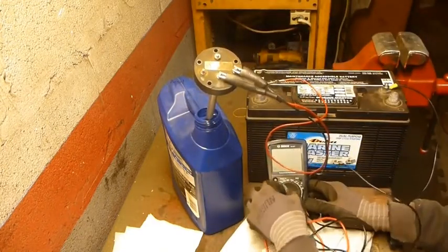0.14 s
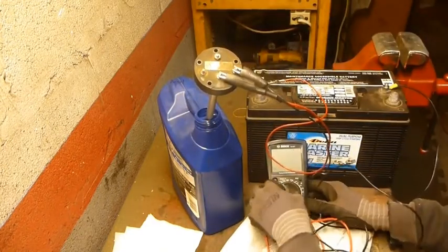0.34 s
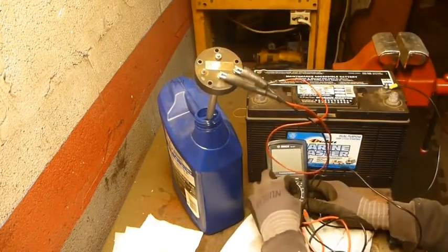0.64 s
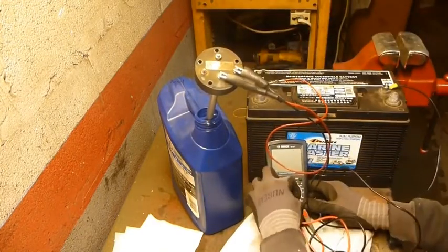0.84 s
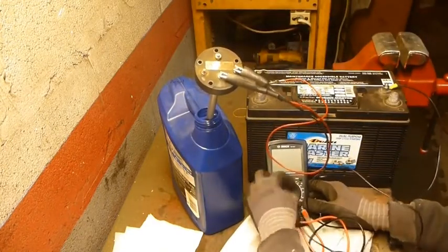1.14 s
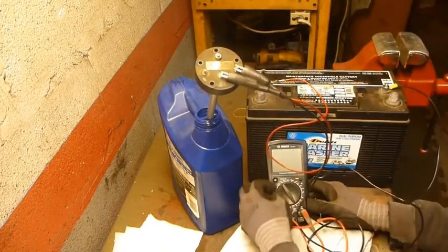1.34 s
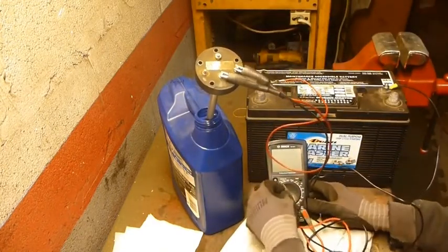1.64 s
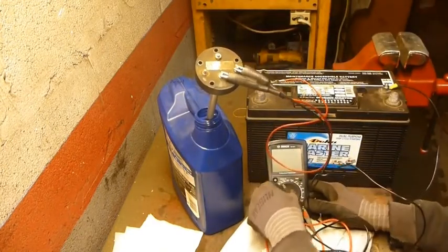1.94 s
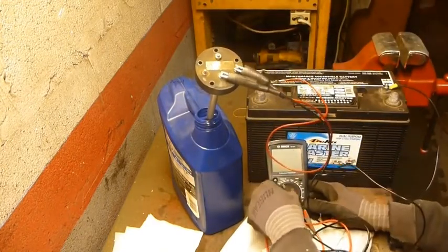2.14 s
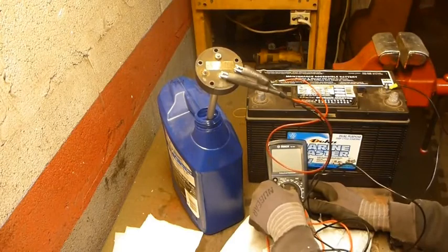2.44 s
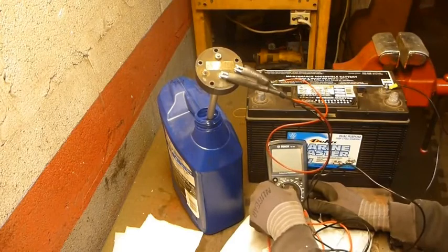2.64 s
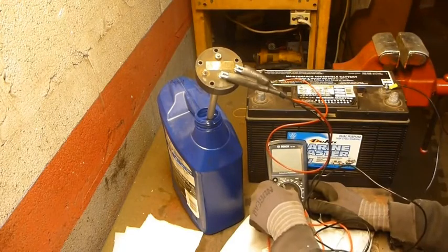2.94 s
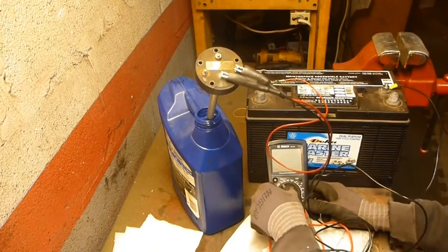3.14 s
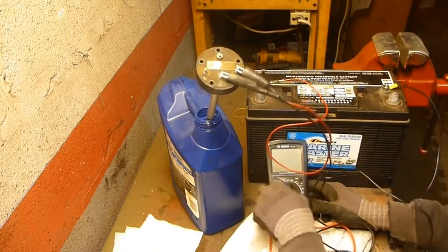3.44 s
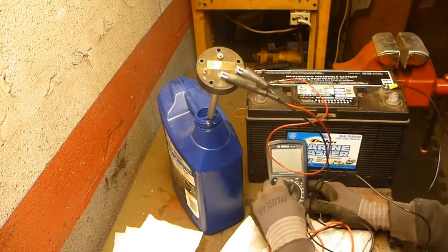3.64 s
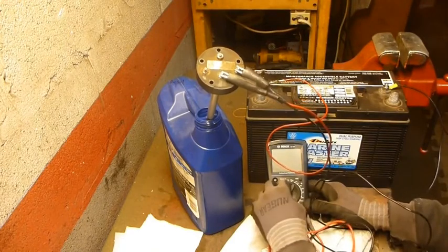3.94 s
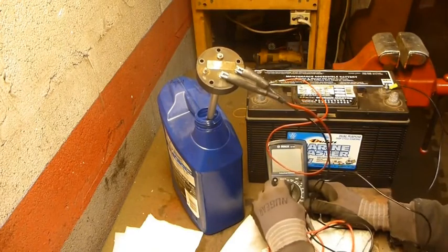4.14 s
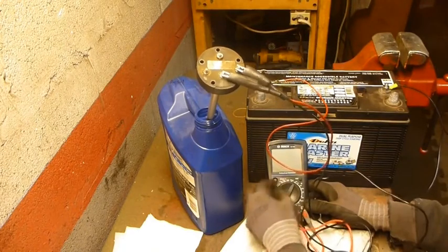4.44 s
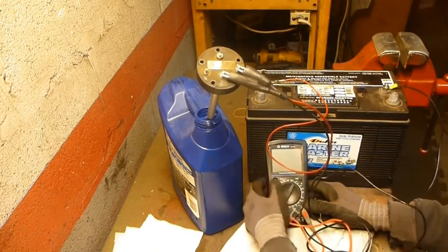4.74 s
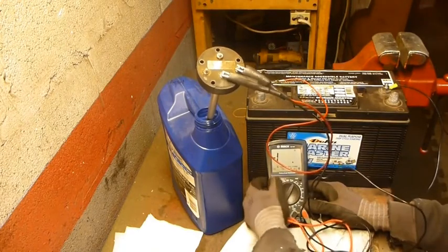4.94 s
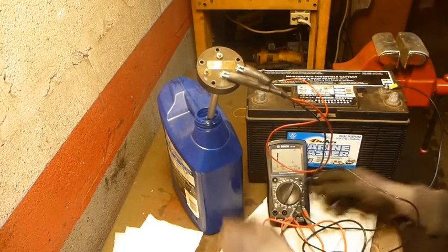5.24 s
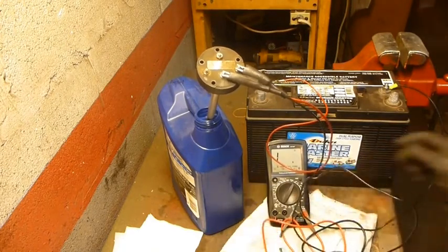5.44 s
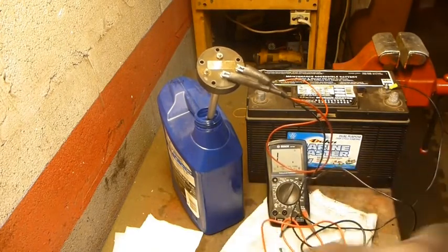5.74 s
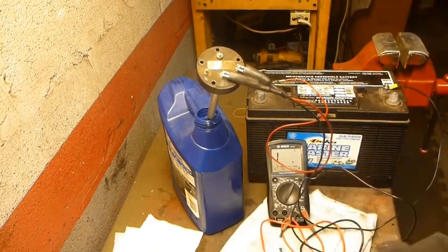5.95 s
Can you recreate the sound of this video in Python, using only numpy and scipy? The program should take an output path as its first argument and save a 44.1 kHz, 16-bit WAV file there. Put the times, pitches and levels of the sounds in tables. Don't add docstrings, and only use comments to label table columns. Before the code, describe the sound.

A meter's rotary dial is turned by hand, a quick run of bright plastic clicks, a pause, then a short return burst over steady hiss.

```python
import sys
import numpy as np
from scipy import signal
from scipy.io import wavfile
from scipy.ndimage import uniform_filter1d

SR = 44100
rng = np.random.default_rng(int(sys.argv[2]) if len(sys.argv) > 2 else 0)


def file_out(sig):
    cols = np.atleast_2d(sig).T
    lim = np.clip(cols, -1, 1)
    pcm = np.round(lim * 32767).astype(np.int16)
    wavfile.write(sys.argv[1], SR, pcm)


def field_ratio(decibels):
    return 10 ** (np.asarray(decibels, dtype=float) / 20)


N = 268789


def evened(x):
    return x / np.sqrt(np.mean(x ** 2) + 1e-20)


def read(points, hz):
    f, value = np.transpose(points)
    return np.interp(np.log(hz + 1), np.log(f + 1), value)


def coloured(points, patchy_db):
    hz = np.fft.rfftfreq(2048, 1 / SR)
    real, imaginary, patches = rng.standard_normal((N // 512 + 5, 1025, 3)).T
    patches = uniform_filter1d(patches, size=20, axis=0)
    patches = evened(uniform_filter1d(patches, size=6, axis=1))
    level_db = read(points, hz)[:, None] + patchy_db * patches
    spectrum = (real + 1j * imaginary) * field_ratio(level_db)
    return evened(signal.istft(spectrum, nperseg=2048, noverlap=1536)[1][:N])


def ring(drive, modes, luck_db, blur=0.65):
    out = np.zeros(len(drive))
    for (hz, width, db), strength_db in zip(modes, luck_db):
        radius = np.exp(-np.pi * width * blur / SR)
        angle = 2 * np.pi * hz / SR
        mode = signal.lfilter([1, 0, -1], [1, -2 * radius * np.cos(angle), radius ** 2], drive)
        out += field_ratio(db + strength_db) * evened(mode)
    return out


def background():
    # frequency in Hz, density in dB per Hz.
    hiss = [(20, -27), (54, -21), (112, -5), (238, -2.5), (565, -6.5), (1340, -13.5), (3350, -21),
            (15500, -35.5)]
    # frequency in Hz, level in dB rms.
    harmonics = [(120, -70), (240, -67), (360, -60), (480, -57), (600, -62.5)]
    hum_width_hz = 10.7
    hum = np.zeros(N)
    for hz, db in harmonics:
        hum += ring(rng.standard_normal(N), [(hz, hum_width_hz, db)], [0])
    return field_ratio(-45.5) * coloured(hiss, patchy_db=0.38) + hum


def click(snap_db, thud_db, panel_db, favoured_hz, knock_db, tick_db, length_ms, flank):
    # frequency in Hz, width in Hz, level in dB.
    knock = [(170, 45, -13.5), (214, 97, 0.5), (300, 300, -26)]
    thud = [(475, 64, 2.5), (733, 210, -0.5), (874, 84, 2), (1200, 134, -1)]
    panel = [(1790, 130, -13.5), (2036, 99, -2), (2268, 240, 1.5), (2480, 140, -8)]
    snap = [(3780, 500, -2), (4340, 880, -4), (4750, 910, -4.5), (5840, 850, -2), (7060, 3300, -32)]
    tick = [(8680, 480, -8), (10130, 1900, 4.5), (11250, 1100, -2.5), (13100, 650, 3), (15100, 2100, -29)]
    # level in dB re the blow, decay time T60 in s.
    garage = [(-0.5, 0.1), (-7, 0.14), (-13.5, 0.24), (-8.5, 0.17), (-11, 0.17)]
    part_edges_hz = (1500, 3000, 7800)
    favour_db, favour_sharpness = 5.5, 13

    ms = np.arange(9000) / SR * 1000
    luck_db = rng.standard_normal((5, 6))
    noise = rng.standard_normal((2, 5, len(ms)))
    impacts = noise[0] * field_ratio(3.6 * np.minimum(rng.exponential(1, len(ms)), 3.2))

    u = np.maximum(ms - 10, 0) / np.maximum(0.61 * length_ms, .05)
    v = np.maximum(ms - 9.1, 0) / np.maximum(0.789 * length_ms, .05)
    climb = 0.065 * np.exp(-abs(ms - 10) / 2.8)
    rattle = u * np.exp(-u)
    push = v * np.exp(-v) + climb
    hard_contacts = rattle * (np.exp(-.6 * u) + 0.087)

    # level in dB, force envelope, modes, strength of its one firm landing
    parts = ((knock_db - 3.5, push, knock, 1.3),
             (snap_db + thud_db, push, thud, 0.82),
             (snap_db + panel_db, rattle + climb, panel, 0.83),
             (snap_db - 3.0, rattle, snap, 0.62),
             (snap_db + tick_db, hard_contacts, tick + [flank], 0.17))
    favoured_part = 1 + np.searchsorted(part_edges_hz, favoured_hz)
    out = np.zeros(len(ms))
    for k, ((db, force, modes, firm), (tail_db, t60)) in enumerate(zip(parts, garage)):
        if k == favoured_part:
            modes = modes + [(favoured_hz, favoured_hz / favour_sharpness, favour_db)]
        drive = force * impacts[k]
        drive[np.argmax(force)] += firm * np.linalg.norm(drive)
        direct = ring(drive, modes, luck_db[k])
        direct = direct / np.sqrt(uniform_filter1d(direct ** 2, size=130).max())
        build_up = 1 - np.exp(-np.maximum(ms - 11., 0) / 2.1)
        decay = field_ratio(-60 * (ms - 8) / 1000 / t60)
        diffuse = evened(ring(noise[1, k], modes, luck_db[k], blur=1.6))
        out += field_ratio(db) * (direct + field_ratio(tail_db) * build_up * decay * diffuse)
    return out


def dial():
    # time in s, snap level in dB,
    # thud and panel levels in dB re the snap, favoured resonance in Hz.
    seated = [
        (0.463, -18, -9.5, -5.5, 10300),
        (0.5465, -24, -4.5, -2.5, 2310),
        (0.6303, -22.5, -11.5, -3.5, 5950),
        (0.6733, -23.5, -1.5, -4, 870),
        (0.7009, -23.5, 2, -3, 905),
        (0.7541, -26, -5, -5, 3580),
        (0.822, -23, -3.5, 0, 2490),
        (0.8772, -24, -1.5, 2, 2310),
        (3.5103, -17, -5, -5.5, 513),
        (3.5878, -21.5, -8.5, 2, 2600),
    ]
    # time in s, snap level in dB,
    # thud and panel levels in dB re the snap, favoured resonance in Hz.
    glancing = [(0.4229, -18, -13, -1.5, 2100), (0.4317, -20.5, -14, -3, 3640),
                (0.4732, -25, -11, -5, 2200), (0.477, -24, -9, -1, 4750), (0.5534, -21, -8, -2.5, 491),
                (0.9004, -42.5, 4, 0, 478), (1.1306, -42, -14, -16, 3720), (1.136, -51.5, 10, -10, 910),
                (3.5164, -21, -4, 0, 860), (3.6654, -26, -2, -0.5, 1150), (5.5195, -52, 3, -13, 4750)]
    # frequency in Hz, width in Hz, level in dB.
    tick_forward = (8780, 490, 1.7)
    tick_back = (13800, 970, 1)
    bounce_s, rest_s, reverse_s = .03, .3, 2
    soft_db, soft_dull = -28, 2.5

    blows = [(*row, -30, 3.1) for row in seated]
    blows += [(*row, -43, 2.8) for row in glancing]
    out, last_s = np.zeros(N + 9000), 0
    for s, snap_db, thud_db, panel_db, hz, knock_db, length_ms in sorted(blows):
        gap_s, last_s = s - last_s, s
        returning = s > reverse_s
        tick_db = -4.5 if gap_s < bounce_s else -2.5
        tick_db += soft_dull * min(snap_db - soft_db, 0)
        if returning and bounce_s < gap_s < rest_s:
            tick_db -= 2.5
        flank = tick_back if returning or gap_s > rest_s else tick_forward
        start = round((s - .0105) * SR)
        out[start:start + 9000] += click(snap_db, thud_db, panel_db, hz, knock_db, tick_db, length_ms, flank)
    return signal.sosfilt(signal.butter(3, 110, "high", fs=SR, output="sos"), out[:N])


def glove():
    # time in s, level in dB, hold in ms.
    rubs = [
        (4.79, -71, 60),
        (4.86, -67, 8),
        (4.898, -66, 4),
        (5.092, -59, 6),
        (5.135, -53, 62),
        (5.278, -52, 6),
        (5.946, -50.5, 8),
        (6.0, -68, 90),
    ]
    # frequency in Hz, density in dB per Hz.
    rustle_colour = [(500, -11), (2000, 7), (4000, 4), (8000, 1), (14000, 5), (16000, -8)]
    rise_db_per_ms, fall_db_per_ms = 1.5, .5
    t = np.arange(N) / SR
    grain = field_ratio(4.5 * uniform_filter1d(rng.exponential(1, N), size=40))
    pressure = np.zeros(N)
    for s, db, held_ms in rubs:
        rise_db = rise_db_per_ms * np.maximum(1000 * (s - t), 0)
        fall_db = fall_db_per_ms * np.maximum(1000 * (t - s) - held_ms, 0)
        pressure += field_ratio(db - rise_db - fall_db)
    return pressure * field_ratio(-2.0) * evened(grain * coloured(rustle_colour, patchy_db=0))


def scuffs():
    # time in s, level in dB, frequency in Hz, width in Hz, length in ms.
    contacts = [
        (4.98, -57, 2010, 400, 12),
        (5.155, -58, 2030, 300, 14),
        (5.2, -53, 2010, 400, 15),
        (5.45, -56, 3470, 900, 25),
        (5.69, -51, 1514, 140, 44),
        (6.0, -59, 3780, 1800, 130),
        (5.17, -50.5, 170, 150, 180),
        (5.45, -54, 805, 1200, 1800),
    ]
    t = np.arange(N) / SR
    out = np.zeros(N)
    for s, db, hz, width, length_ms in contacts:
        once = ring(rng.standard_normal(N), [(hz, width, 0)], [0])
        band = ring(once, [(hz, width, db)], [0])
        out += band * np.exp(-(2000 * (t - s) / length_ms) ** 2)
    return out


def gain_control(x):
    loud_db, duck_db, recover_db_per_s, start_db = -28, 1.5, 0.65, 1
    t = np.arange(N) / SR
    loud = uniform_filter1d(x ** 2, size=400) > field_ratio(2 * loud_db)
    last_loud_s = np.maximum.accumulate(np.where(loud, t, -start_db / recover_db_per_s), axis=1)
    gain_db = np.minimum(recover_db_per_s * (t - last_loud_s), duck_db)
    return x * field_ratio(uniform_filter1d(gain_db, size=400))


def scene():
    return (background() + dial() + glove() + scuffs())[None]


def band_limit(x):
    return signal.sosfilt(signal.butter(12, 16970, fs=SR, output="sos"), x)


def record(dry):
    # frequency in Hz, width in Hz.
    notches = [(2900, 230), (7845, 80), (11690, 1130)]
    ceiling, edge_hz = 0.51, 15730
    x = ceiling * np.tanh(gain_control(dry) / ceiling)
    for hz, width in notches:
        x = signal.lfilter(*signal.iirnotch(hz, hz / width, SR), x)
    edge = signal.firwin(1023, edge_hz, window=("kaiser", 9), fs=SR)
    low = signal.oaconvolve(x, edge[None], "same")
    power = uniform_filter1d(x ** 2, size=200)
    loud = uniform_filter1d(np.clip(power / field_ratio(-54) - 1, 0, 1), size=100)
    upper_band = signal.sosfilt(signal.butter(4, 16100, fs=SR, output="sos"), x - low)
    return band_limit(low + field_ratio(-27) * loud * upper_band)


dry = scene()
out = record(dry)
file_out(out)
```